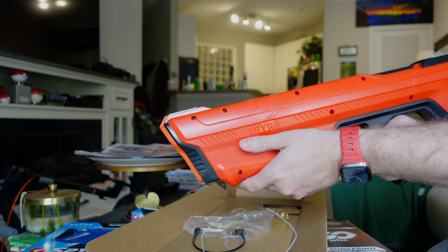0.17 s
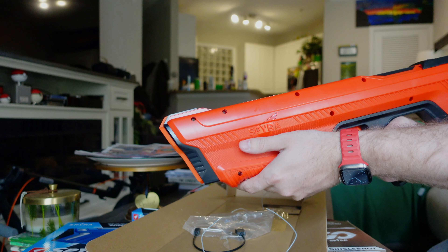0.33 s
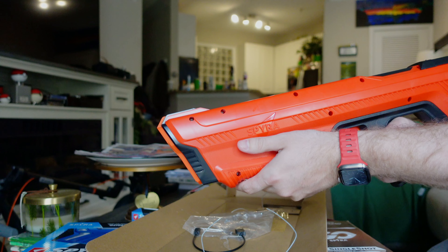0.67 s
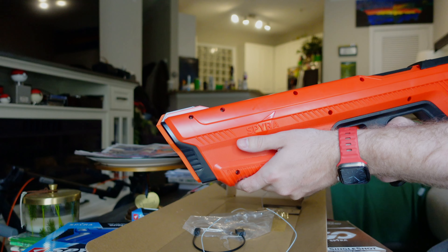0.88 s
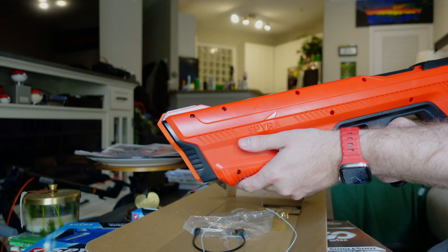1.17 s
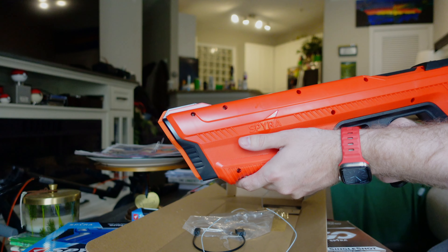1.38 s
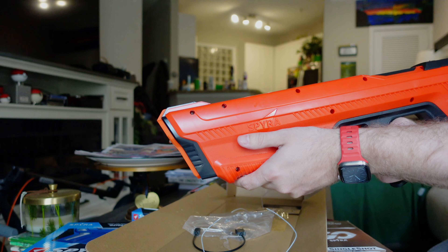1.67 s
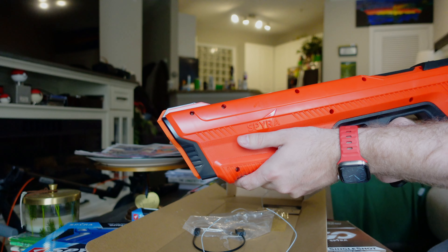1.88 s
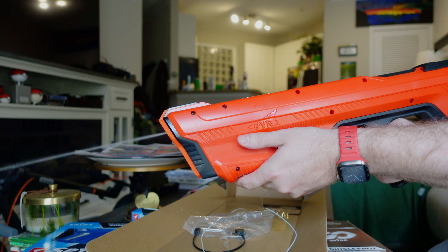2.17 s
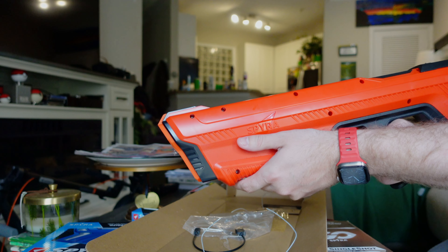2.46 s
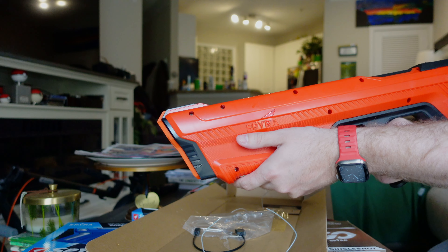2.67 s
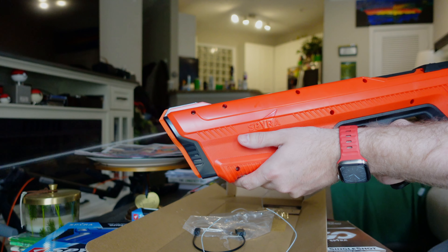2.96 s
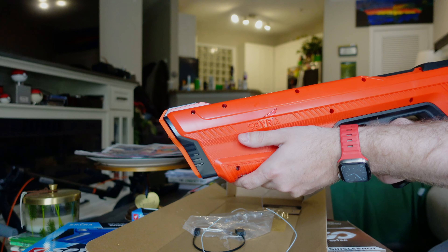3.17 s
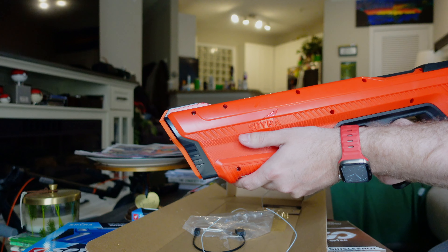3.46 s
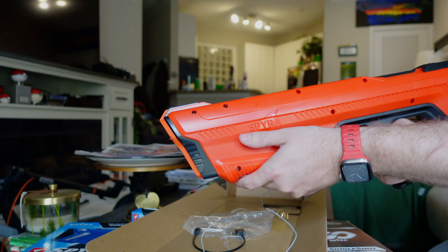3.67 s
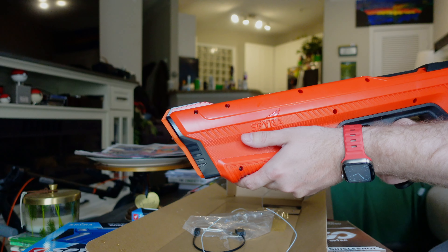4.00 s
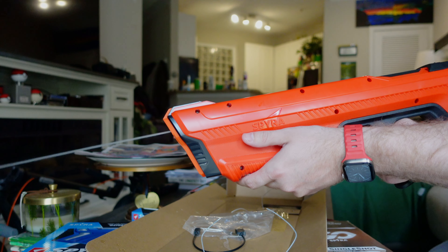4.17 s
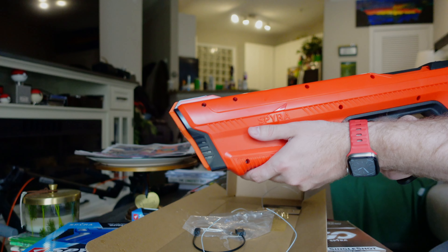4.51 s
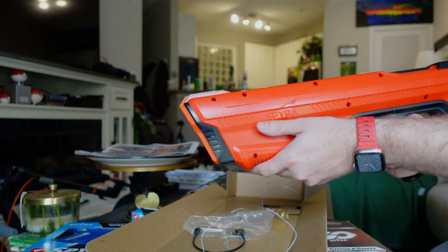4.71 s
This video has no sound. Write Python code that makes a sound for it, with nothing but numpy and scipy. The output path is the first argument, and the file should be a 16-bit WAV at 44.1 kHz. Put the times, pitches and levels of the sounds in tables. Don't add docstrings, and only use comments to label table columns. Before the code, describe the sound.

Close up in a furnished room, a battery water blaster whirs, clacks and squirts five times, with trigger clicks and quiet hum between shots.

```python
import sys
import numpy as np
from scipy import signal
from scipy.fft import rfft, irfft, next_fast_len
from scipy.io import wavfile
from scipy.ndimage import uniform_filter1d, map_coordinates

SR = 44100
rng = np.random.default_rng(int(sys.argv[2]) if len(sys.argv) > 2 else 0)


def level_to_linear(level):
    exponent = np.asarray(level, float) / 20
    return 10 ** exponent


def store_wav(level_fs):
    pcm = np.round(np.clip(np.atleast_2d(level_fs), -1, 1) * 32767)
    wavfile.write(sys.argv[1], SR, pcm.T.astype(np.int16))


N = 213752
LEAD = 2 * SR // 3
M = N + LEAD
LIFT_DB = 7


def unit(x):
    return x / np.sqrt(np.mean(x ** 2) + 1e-20)


def along(points, hz):
    f, v = np.transpose(points)
    return np.interp(np.log(hz + 1), np.log(f + 1), v)


def clock():
    return (np.arange(M) - LEAD) / SR


def curves(tables, fade):
    s, *cols = np.transpose(np.concatenate(tables))
    t = clock()
    gate = sum((t >= rows[0][0]) & (t < rows[-1][0]) for rows in tables)
    return [np.interp(t, s, c) for c in cols], uniform_filter1d(np.minimum(gate, 1.), int(fade * SR))


def wobble(rate):
    coarse = np.arange(0, M + 16, 16)
    knots = rng.standard_normal(int(M * rate / SR) + 4)
    curve = map_coordinates(knots, [coarse * rate / SR])
    return np.interp(np.arange(M), coarse, curve)


def filtered(x, response):
    m = next_fast_len(M + SR // 2)
    return irfft(rfft(x, m) * response(np.fft.rfftfreq(m, 1 / SR)), m)[:M]


def modes(table):
    def response(f):
        return sum((-1) ** k * level_to_linear(db) * 1j * f * w / (c * c - f * f + 1j * f * w)
                   for k, (c, w, db) in enumerate(table))
    return response


def noise(spectrum, grain_db, rate, beat=1):
    grains = beat * rng.standard_normal(M) * level_to_linear(grain_db * wobble(rate))
    return unit(filtered(grains, lambda hz: level_to_linear(along(spectrum, hz))))


# (frequency [Hz], level [dB])
HUM = [(118.4, -65), (177.6, -50.5), (301.5, -52), (419.9, -54), (699.8, -62.5)]
# (frequency [Hz], density [dB per Hz])
FLOOR = [(15, -44), (25, -10), (55, -27), (110, -3.5), (200, -5.5), (241, -12), (307, 2), (425, -4),
         (905, -9.5), (1550, -16.5), (5370, -25), (15800, -32)]
# (start [s], end [s], frequency [Hz], level [dB])
TWEET = (3.915, 4.0, 2700, -59)


def background():
    t = clock()
    hum = sum(level_to_linear(db - 5 + 1.9 * wobble(19)) * np.sin(2 * np.pi * hz * t) for hz, db in HUM)
    start, end, hz, db = TWEET
    sounding = (t > start) & (t < end)
    squeak = level_to_linear(db + 5 * wobble(42)) * sounding * np.sin(2 * np.pi * hz * t + 2.5 * wobble(250))
    floor_db = -50
    return hum + squeak + level_to_linear(floor_db) * noise(FLOOR, grain_db=1.2, rate=30)


# (frequency [Hz], time to fall 60 dB [s])
ROOM = [(300, 0.45), (1000, 0.44), (3000, 0.4), (8000, 0.35), (15000, 0.22)]


def room(x):
    hz, t, z = signal.stft(rng.standard_normal(SR), SR, nperseg=256)
    tail = signal.istft(z * level_to_linear(-60 * t / along(ROOM, hz)[:, None]), SR, nperseg=256)[1]
    delayed = np.pad(x, (200, 0))
    return signal.fftconvolve(delayed, tail / np.linalg.norm(tail))[:M]


# (time [s], frequency [Hz], level [dB])
THUMPS = [
    (0.317, 108, -18.5),
    (1.37, 105, -15.5),
    (2.17, 110, -30),
    (3.02, 109.4, -42),
    (4.22, 110, -42),
]


def thumps():
    total = 0
    for s, hz, db in THUMPS:
        age = np.maximum(clock() - s, 0)
        total = total + level_to_linear(db - 60 * age / 0.17) * (1 - np.exp(-age / 0.019)) * np.sin(2 * np.pi * hz * age)
    return total


# (frequency [Hz], width [Hz], level [dB])
SHELL = [(598, 170, 9), (1170, 265, 9), (2150, 520, 3), (3180, 660, -2.5), (5250, 1200, -13.5)]
# (frequency [Hz], width [Hz], level [dB])
BOX = [(325, 74, 1), (437, 120, -1.5), (647, 69, 5.5), (972, 91, -3), (1093, 94, 5.5)]


def contacts(rows, crack_s, rise_s):
    layers, t = np.zeros((3, M + SR)), np.arange(SR // 20) / SR
    fall_s = crack_s * np.array([[1], [2], [1]])
    shape = level_to_linear(-60 * t / fall_s) * (1 - np.exp(-t / rise_s))
    for s, db, dull_db, bright_db in rows:
        crack = shape * rng.standard_normal(len(t))
        levels = level_to_linear(db + np.array([[0], [dull_db], [bright_db]]))
        layers[:, LEAD + round(s * SR):][:, :len(t)] += levels * crack
    body, dull, bright = layers[:, :M]
    tick = filtered(bright, lambda f: (1j * f / 6000) ** 2 / (1 + 1j * f / 7000) ** 4)
    return level_to_linear(3.5) * filtered(body, modes(SHELL)) + level_to_linear(15) * filtered(dull, modes(BOX[1:3])) + level_to_linear(17.5) * tick


# (time [s], peak [dB], dull part [dB], bright part [dB])
TRIGGER = [
    (.074, -21, -2.5, -31),
    (1.132, -14.5, -6, -25.5),
    (1.953, -18.5, 2.5, -34.5),
    (2.804, -13.5, -35, -40),
    (4.016, -10.5, -5, -41),
    (4.039, -25, 5.5, -39.5),
]
# (time [s], peak [dB], dull part [dB], bright part [dB])
DRIPS = [
    (0.849, -10.5, -19, -40),
    (.875, -12, -18, -40),
    (1.18, -40, 4, -40),
    (2.839, -32, 5.5, -42.5),
    (3.9, -52, -33, -5),
]
# (time [s], peak [dB], dull part [dB], bright part [dB])
RUBS = [
    (.174, -26, -16, -45),
    (1.224, -20.5, -4, -45),
    (2.874, -22.5, -23, -44),
    (4.074, -14, -9, -45),
]


def fingers_and_drips():
    taps = contacts(TRIGGER + DRIPS, crack_s=0.018, rise_s=0.00046)
    return taps + contacts(RUBS, crack_s=.06, rise_s=0.0066)


def swells(rows, rise, fall):
    t = clock()
    return np.max([db - rise * np.maximum(s - t, 0) - fall * np.maximum(t - s - hold, 0)
                   for s, db, hold in rows], axis=0)


# (start [s], release [s], reload [s], stop [s], low gear hum [dB])
SHOTS = [
    (0.199, .306, 0.53, 0.788, -31),
    (1.254, 1.359, 1.572, 1.843, -31),
    (2.055, 2.165, 2.36, 2.645, -31.5),
    (2.902, 3.016, 3.22, 3.49, -33),
    (4.098, 4.214, 4.425, 4.684, -34),
]
# (time [s], drumming [dB], hiss [dB])
SLUGS = [
    (.316, -6, -18),
    (1.368, -4, -18),
    (2.167, -10, -16),
    (3.017, -8.5, -27),
    (4.22, -14.5, -16),
]
# (time [s], level [dB], hold [s])
ROLLS = [
    (.37, -14.5, .005),
    (1.385, -13.5, .005),
    (1.567, -19.5, .005),
    (2.267, -12.5, 0.13),
    (3.112, -11, 0.15),
    (4.312, -9.5, 0.15),
]
# (time [s], level [dB], hold [s])
JETS = [
    (.35, -30.5, 0.39),
    (1.385, -26, 0.063),
    (1.567, -28.5, 0.013),
    (2.211, -15.5, 0.026),
    (3.054, -16, .005),
    (4.234, -21.5, .15),
]


def water_levels():
    def slug(column):
        return swells([(row[0], row[column], 0) for row in SLUGS], rise=1500, fall=415)

    drum_db = np.maximum(slug(1), swells(ROLLS, rise=700, fall=125))
    hiss_db = np.maximum(slug(2), swells(JETS, rise=150, fall=55))
    flowing = [[(release, 0), (stop, 0)] for _, release, _, stop, _ in SHOTS]
    return (drum_db, hiss_db), curves(flowing, fade=0.0068)[1]


# (frequency [Hz], density [dB per Hz])
DRUM = [(24, -70.5), (40, -28.5), (206, -11), (320, 3.5), (679, -2), (890, 5.5), (961, -35), (1060, 0),
        (1310, -9.5), (3170, -5.5), (4000, -34), (5200, -56), (8800, -120)]
# (frequency [Hz], density [dB per Hz])
JET = [(2650, -28), (4500, -12), (5740, -12), (7560, 6.5), (9240, 6.5), (10700, -0.5), (11500, -7),
       (13000, -19.5)]
# (frequency [Hz], density [dB per Hz])
AIR = [(6000, -61.5), (6800, 3), (9000, -8), (12000, -1.5), (15800, -17)]


def water():
    (drum_db, hiss_db), gate = water_levels()
    drops = rng.standard_normal(M) * (rng.random(M) < 1100 / SR)
    beats = unit(filtered(drops, modes(BOX)))
    drum = 0.52 * beats + 0.73 * noise(DRUM, grain_db=3, rate=90)
    spray = level_to_linear(hiss_db - 8) * noise(JET, grain_db=3.5, rate=380)
    spit = level_to_linear(1.9 * (hiss_db + 15.0) - 22.5) * noise(AIR, grain_db=-3.0, rate=310)
    return gate * (level_to_linear(drum_db - 0.1) * drum + spray + spit)


# (time [s], peak [dB], dull part [dB], bright part [dB])
CLACKS = [(0.199, -10, -40, -40), (0.307, -10, 1, -24), (0.313, -6, -3.5, -22), (0.498, -7, -38, -19),
          (1.254, -16, -40, -46), (1.358, -11, -2, -16), (1.469, 2, -32, -37), (1.552, 4, -66, -28.5),
          (2.054, -9, -10, -35), (2.164, -4, -10, -24.5), (2.639, -13, -36.5, -30.5),
          (2.7, -15.5, -7, -28.5), (2.9, -4, -18, -42), (3.015, 1, -9, -25), (3.589, -14, -31, -57),
          (4.09, -4, -23, -22), (4.214, -1.5, 1, -16.5), (4.296, -5, -3, -33.5), (4.681, -3, -15, -27)]


def clacks():
    return level_to_linear(-3.5) * contacts(CLACKS, crack_s=0.014, rise_s=0.00022)


# (wound up [Hz], running free [Hz], dragging the spring [Hz], at the end [Hz])
RATES = [(1560, 1880, 1600, 1585), (1585, 1880, 1593, 1578), (1580, 1930, 1590, 1560),
         (1570, 1910, 1590, 1565), (1570, 1920, 1600, 1590)]


def gearing():
    t, tooth_hz, hum = clock(), np.full(M, 1567.), np.zeros(M)
    for (start, release, reload, stop, hum_db), (wound, free, drag, end) in zip(SHOTS, RATES):
        spin_up = 750 * np.exp(-np.maximum(t - start, -.01) / .014)
        winding = wound - 1200 * (release - t) - spin_up
        racing = free + (wound - free) * np.exp(-np.maximum(t - release, 0) / .03)
        sag = (end - drag) * (t - reload) / (stop - reload) - 15 * np.exp(np.minimum(t - stop, 0) / .015)
        dragging = drag + sag + (free - drag) * np.exp(-np.maximum(t - reload, 0) / .024)
        running = (t > start - .02) & (t < stop + .02)
        rate = np.select([t < release, t < reload], [winding, racing], dragging)
        tooth_hz[running] = rate[running].clip(400)
        hum[running] = level_to_linear(hum_db) * np.clip((t[running] - start) / 0.096, 0, 1)
    return tooth_hz, hum


# (time [s], whine [dB], octave [dB], load [0-1], rattle [dB])
EARLIER = [
    (-.6, -18.5, -26, 1.1, -11),
    (-.2, -6.5, -10, 1.45, -3),
]
# (time [s], whine [dB], octave [dB], load [0-1], rattle [dB])
WINDING = [
    (-.003, -49, -27, 0.3, -21),
    (.013, -7.5, -18, 0.8, -15),
    (.035, -11, -37, 1.1, -15),
    (.065, -9.5, -12.5, 1, -18.5),
]
# (time [s], whine [dB], octave [dB], load [0-1], rattle [dB])
RELEASE = [
    (-.004, -26.5, -24.5, 0.94, -13.5),
    (.008, -36, -37, 0.28, -14.5),
]
# (early [dB], full speed [dB], coasting [dB])
FREE_WHINES = [(-25, -12, -13), (-16, -14, -13), (-14, -17, -16.5), (-12.5, -21.5, -25.5),
               (-11.5, -30.5, -31)]
# (spring caught [dB], dragging [dB], stalling [dB], octave lift [dB])
LOADED_WHINES = [(-22, -15.5, -18.5, -3), (-26, -20.5, -14, 0.5), (-30.5, -23, -18, 2),
                 (-39, -27, -17, 2.5), (-26, -14.5, -18, 1.5)]


def motor_levels():
    # (octave [dB], load [0-1], rattle [dB])
    racing, coasting, meshing = (-35, .05, -16.5), (-28, .15, -21), (-27, 0.75, -17)
    loaded_stages = (-23, 0.92, -16), (-22.5, 0.99, -17.5), (-17.5, .8, -11.5)
    tables = [EARLIER]
    for shot, free_whines, loaded_whines in zip(SHOTS, FREE_WHINES, LOADED_WHINES):
        start, release, reload, stop, _ = shot
        early, full, coast = free_whines
        *loaded, lift_db = loaded_whines
        times = (release + .06, release + .13, reload - .026, reload - 0.019,
                 reload + 0.1, stop - 0.037, stop)
        lifted = [(db + lift_db, *rest) for db, *rest in loaded_stages]
        stages = racing, racing, coasting, meshing, *lifted
        whines = early, full, coast, coast, *loaded
        rows = [(start + s, *rest) for s, *rest in WINDING]
        rows += [(release + s, *rest) for s, *rest in RELEASE]
        rows += [(s, db, *stage) for s, db, stage in zip(times, whines, stages)]
        tables.append(rows)
    (whine_db, octave_db, load, rattle_db), gate = curves(tables, fade=0.013)
    over_db = -56 + 30 * load
    second_db = -38.5 + 11.5 * load
    return (whine_db, octave_db, over_db, second_db, rattle_db, load), gate


# (multiple of the tooth rate, level [dB])
OVERTONES = [(3, 1), (4, -9.5)]
# (multiple of the tooth rate, level [dB])
BRUSHES = [(2, -2.5), (3, -2), (4, -11.5), (3.3, -6), (3.65, -5), (5.7, -25), (6, -18), (6.75, -18),
           (7, -13.5), (7.8, -13), (8, -16)]
# (multiple of the tooth rate, level [dB])
SECOND = [(.7, -1.5), (.9, -3), (1.3, 3), (1.5, -21), (1.6, -6.5), (1.7, -1), (2.3, -4), (2.4, -5.5)]
# (frequency [Hz], density [dB per Hz])
RATTLE = [(210, -73.5), (350, -36), (470, -37), (521, -15), (848, -9.5), (1630, -1.5), (1780, -6.5),
          (2110, -4), (2870, -8), (3260, -6), (4320, -13.5), (4910, -18), (7500, -25.5), (9750, -67),
          (16500, -120)]
# (frequency [Hz], density [dB per Hz])
SIZZLE = [(3820, -22), (6500, 0), (6800, -4), (7570, -38.5), (8400, -8), (9180, -12.5), (10000, -9),
          (10700, -3.5), (12700, -10), (13100, -8), (13500, -31), (14100, -32), (15800, -19.5)]


def motor():
    (whine_db, octave_db, over_db, second_db, rattle_db, load), gate = motor_levels()
    tooth_hz, hum = gearing()
    teeth = 2 * np.pi * np.cumsum(tooth_hz) / SR + .07 * wobble(250)
    free = np.clip((tooth_hz - 1640) / 150, 0, 1) * np.clip((.7 - load) / .4, 0, 1)
    wheel = teeth / 31.5 + .3 * wobble(30)
    beats = level_to_linear(14 * np.cos(wheel) + 2.2 * wobble(60))
    sway = level_to_linear(2.2 * np.cos(2 * wheel) + 1.1 * wobble(60))
    throb = free * unit(beats) + (1 - free) * unit(sway)
    slack = .7 * free * wobble(170)

    def family(table, blur):
        return sum(level_to_linear(db + 3.0 * wobble(70)) * np.sin(k * teeth + blur * wobble(200)) for k, db in table)

    tones = level_to_linear(whine_db) * throb * np.sin(teeth + slack)
    tones += level_to_linear(octave_db) * throb * np.sin(2 * (teeth + slack) + 0.24 * wobble(220))
    settled_db = -9 * np.clip((tooth_hz - 1650) / 120, 0, 1)
    tones += level_to_linear(over_db + settled_db) * (family(OVERTONES, .65) + family(BRUSHES, 2.1))
    tones += level_to_linear(second_db) * family(SECOND, .7) + hum * np.sin(.3 * teeth)
    wheel_beat = level_to_linear(3.6 * free * np.cos(wheel))
    rattle = level_to_linear(rattle_db + 0.26) * noise(RATTLE, grain_db=2.6, rate=300, beat=wheel_beat)
    sizzle = level_to_linear(rattle_db - 16.5 - 20 * free) * noise(SIZZLE, grain_db=3.5, rate=270)
    knocks = level_to_linear(whine_db - 22) * free * throb * noise(JET, grain_db=4.5, rate=300)
    return gate * (np.sqrt(2) * tones + rattle + sizzle + knocks)


def scene():
    quiet = level_to_linear(-LIFT_DB)
    gun = motor() + water() + clacks() + quiet * fingers_and_drips()
    ring = modes([(1530, 400, -11.5)])
    echo = filtered(room(gun), lambda f: 1j * f / (600 + 1j * f) + ring(f))
    echo_db = -12
    mix = level_to_linear(-2.5) * gun + level_to_linear(echo_db) * echo + thumps() + quiet * background()
    return mix[None, LEAD:]


def gain_control(x, knee_db, share, release_db):
    slope = release_db * np.arange(N) / SR
    level_db = 10 * np.log10(np.abs(uniform_filter1d(x ** 2, 400)) + 1e-12)
    held_db = np.maximum.accumulate(level_db + slope) - slope
    cut_db = np.clip(share * (held_db - knee_db), 0, LIFT_DB)
    return x * level_to_linear(LIFT_DB - uniform_filter1d(cut_db, 200))


def low_pass(x):
    return signal.sosfilt(signal.butter(12, 16490, fs=SR, output="sos"), x)


def record(dry):
    top, hard, top_hz = .9, 4., 15870
    x = gain_control(dry[0], knee_db=-23, share=0.53, release_db=153)
    x = x / (1 + np.abs(x / top) ** hard) ** (1 / hard)
    x = filtered(x, lambda f: (f < top_hz) * 1j * f / (40 + 1j * f))[None, :N]
    return low_pass(x)


dry = scene()
out = record(dry)
store_wav(out)
```